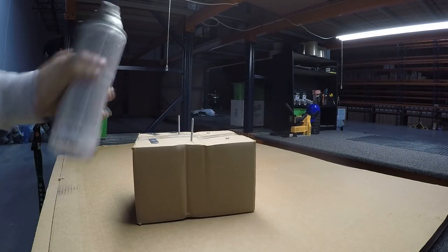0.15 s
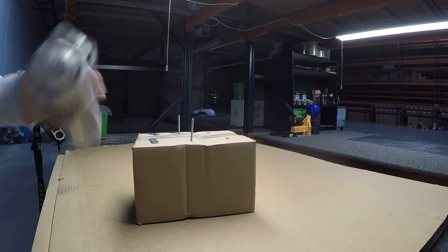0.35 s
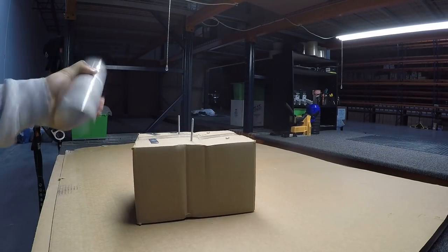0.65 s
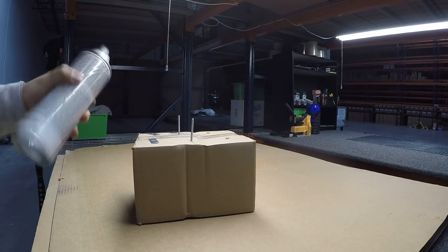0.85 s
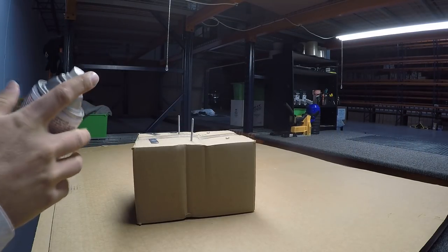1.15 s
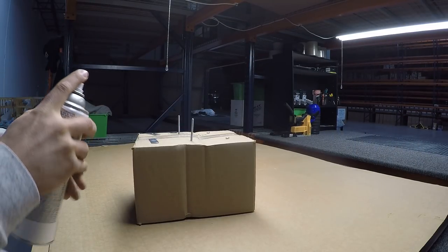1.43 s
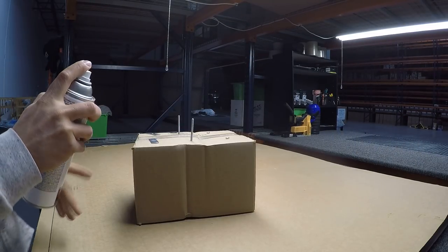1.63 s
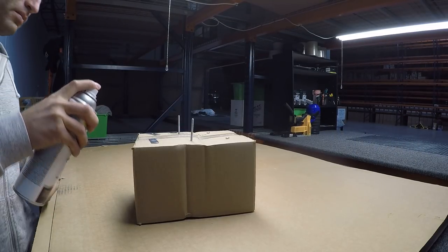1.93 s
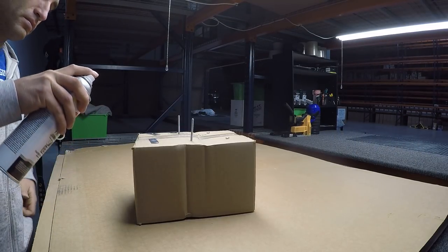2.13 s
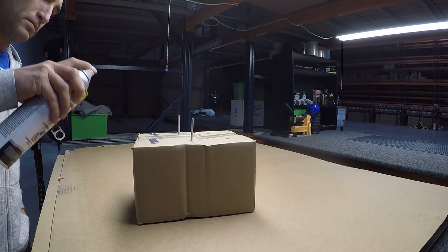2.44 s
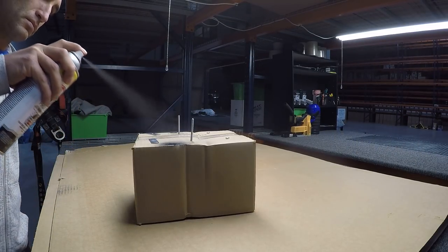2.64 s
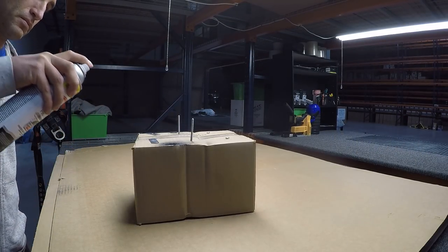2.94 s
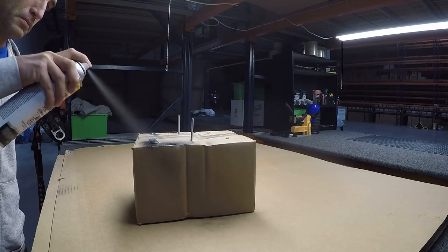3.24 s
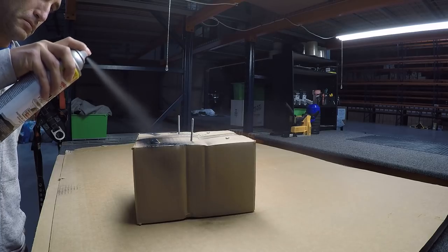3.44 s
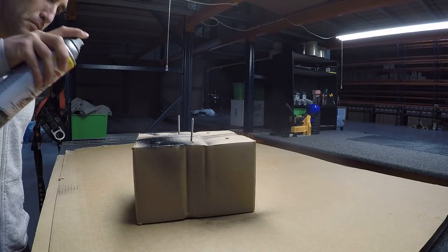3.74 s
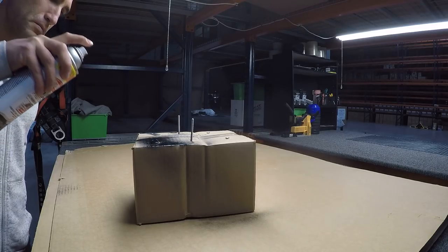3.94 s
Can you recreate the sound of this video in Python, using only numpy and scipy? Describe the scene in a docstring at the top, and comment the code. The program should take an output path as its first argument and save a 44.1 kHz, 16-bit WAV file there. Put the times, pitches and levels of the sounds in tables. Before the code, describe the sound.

A spray paint can is shaken with its ball rattling, then gives a short puff and a longer hiss in a workshop.

```python
"""A spray paint can is shaken over a bench in a large workshop, above a low ventilation rumble.
For the first second its mixing ball slams into the domed ends, skids on the wall and scrapes through paint.
From 1.4 s the can is turned in the hand; the ball rolls and taps the thin steel wall.
The nozzle puffs at 2.6 s and hisses from 3.2 to 3.7 s, the jet bouncing off cardboard.
A few faint taps follow. A near-mono microphone on the bench rounds off the hardest knocks."""
import sys
import numpy as np
from scipy import signal
from scipy.fft import rfft, irfft, next_fast_len
from scipy.io import wavfile
from scipy.ndimage import uniform_filter1d, map_coordinates

SR = 44100
rng = np.random.default_rng(int(sys.argv[2]) if len(sys.argv) > 2 else 0)


def unload_wav(signal):
    """Save mono or channel-first audio to the path in sys.argv[1] as 16-bit WAV at rate SR, clipped to [-1, 1]."""
    wavfile.write(
        sys.argv[1],
        SR,
        np.round(np.clip(np.atleast_2d(signal).T, -1, 1) * 32767).astype(np.int16),
    )


N = 179833
TIME_S = np.arange(N) / SR
RING_S = np.arange(4096) / SR  # time axis of one blow
SAMPLES_PER_MS = SR / 1000

# ventilation: freq_hz, density_db
VENT_SPECTRUM = [(20, 6.5), (45, 4), (70, -6.5), (120, -8), (170, -15), (230, -16.5), (300, -23.5),
                 (500, -28), (900, -34), (2000, -40.5), (5000, -44), (10000, -52.5), (15000, -53.5)]
# ventilation: time_s, level_db
VENT_LEVEL = [(0, -33), (.16, -39.5), (.7, -42.5), (1.3, -37.5), (1.55, -35.5), (2.18, -31), (2.28, -34.5),
              (3.2, -33), (4.08, -35.5)]
# sleeve and hand on the can: peak_s, swish_db, rub_db, t60_s (rise and fall, sign ignored)
HAND_SLIDES = [(1.4, -57, -56, 10), (1.96, -41, -70.5, 0.28), (2.1, -36.5, -50.5, 0.36),
               (2.17, -40.5, -33.5, -0.14)]
# can against the hand: start_s, level_db, t60_s
HAND_JOLTS = [(.0835, -50, .05), (0.4066, -28, 0.045), (0.5073, -24.5, 0.036), (1.095, -27, .05),
              (1.391, -27, 0.043), (1.404, -23.5, 0.042)]
# nozzle presses: open_s, close_s, hiss_db, spurt_db, wet_db
PRESSES = [(2.586, 2.726, -19.5, 1.5, -39), (3.189, 3.7, -21, 4.5, -50)]
# wet paint spat from the nozzle: peak_s, level_db
SPITS = [(2.691, -30.5), (2.721, -43), (3.201, -33.5), (3.714, -40.5)]
# gas jet: freq_hz, density_db
JET_SPECTRUM = [(400, -25), (1000, -27.5), (1900, -19.5), (2400, -19), (2950, -17.5), (3600, -17.5),
                (4200, -13.5), (5200, -9.5), (6500, -2.5), (8300, 1), (10500, 1.5), (12000, -0.5),
                (13500, -3), (15200, -8)]
# hiss off the cardboard as the hand sways: time_s, lag_ms
BOUNCE_LAG = [(2.6, 0.9), (2.66, 0.84), (2.75, 0.78), (3.2, 0.81), (3.27, 0.89), (3.33, 0.81), (3.39, 0.82),
              (3.46, 0.81), (3.53, 0.876), (3.6, 0.88), (3.66, 0.8), (3.73, 0.88)]
# ball rushing through paint: peak_s, level_db
RUSHES = [(0, -27.5), (.1, -29), (.21, -47), (.3, -25), (0.438, -29), (0.522, -24), (.595, -32),
          (0.689, -28.5), (.76, -27.5), (.82, -31), (.975, -32)]
# ball scraping through paint: freq_hz, density_db
SCRAPE_SPECTRUM = [(150, -20.5), (400, -14), (800, -28), (1400, -3), (2200, 0), (3100, 3.5), (4200, -5),
                   (6000, -5), (9000, -11.5), (12000, -16.5), (15000, -20.5)]
# ball on steel: freq_hz, density_db
CLACK_SPECTRUM = [(150, -25), (400, -16), (800, -16.5), (1400, -3.5), (2200, 0.5), (4000, 5), (6000, -2),
                  (9000, -7), (12000, -10), (15000, -20.5)]
# paint lowers the shell ring as the can tips: time_s, pitch_ratio
SHELL_TUNING = [(.8, 0.99), (.9, 0.68), (1.1, .74), (1.45, 0.97)]
# end dome, damped by paint: pitch_hz, t60_s, level_db
DOME_MODES = [(3180, 0.003, 7), (3200, .01, -7), (3820, .004, -14), (4570, 0.0054, -8),
              (5150, 0.0039, -34.5), (9400, .004, -35.5)]
# steel wall; main modes have weak twins that ring on: pitch_hz, t60_s, level_db
WALL_MODES = [(2064, 0.0055, -13), (4524, 0.011, -0.5), (4610, 0.09, -13.5), (7870, 0.0068, 3),
              (9204, 0.016, 1), (8050, 0.095, -15), (9700, 0.1, -9), (6300, .012, -27),
              (10530, 0.026, -12.5), (12000, 0.02, -11.5), (12940, 0.013, -33.5), (13440, 0.0152, -14)]
# grip shifts and damps the middle wall mode: time_s, pitch_hz, gain_db
GRIP_TUNING = [(1.6, 7790, -2), (1.95, 7850, 2), (2.05, 7900, -11), (2.6, 8050, -2), (2.85, 8100, -5.5)]
# ball taps on the wall: start_s, ring_db, low_modes_gain_db, clack_db
WALL_TAPS = [(1.4045, -16.5, -10, -28), (1.556, -14.5, -5, -12), (1.6053, -15, -1, -20),
             (1.661, -21, -0.5, -22), (1.7044, -18.5, -5.5, -18), (1.7842, -21.5, 10.5, -17.5),
             (1.85, -26.5, 10, -24.5), (1.8988, -22, -1, -23.5), (1.932, -23, -1, -23),
             (1.9664, -26.5, 5, -31), (2.006, -15.5, 6, -19), (2.092, -19, 3.5, -22),
             (2.1247, -23, -1, -24), (2.1506, -32.5, 3, -28), (2.4293, -9.5, -4.5, -14.5),
             (2.569, -12, -3.5, -18), (2.669, -14, -13, -23), (2.7907, -17, -3, -22.5),
             (2.8551, -18, -4.5, -23), (2.9093, -20, -0.5, -23), (2.9688, -23.5, -5, -29.5),
             (3.0217, -29.5, -3.5, -30), (3.05, -36, -12, -27.5), (3.827, -45.5, 3, -48.5),
             (3.9932, -47, 4, -40), (4.0051, -43.5, 5, -33.5)]
# glancing hits: start_s, contact_db, tilt_db_per_octave, shell_db, skid_t60_s
GLANCING_KNOCKS = [(0.0459, -19.5, 6.5, -17, 0.023), (0.0759, -10, 2, -34, 0.015),
                   (0.0779, -3, -.5, -28, 0.052), (0.0841, -15, 7, -31, 0.054), (.1136, -16, 1, -32, 0.018),
                   (.129, -11.5, -1, -25, 0.0051), (0.1403, -13.5, 1.5, -37, 0.0054),
                   (0.1453, -13, 6, -37, 0.0015), (0.1997, -7.5, 1, -33, 0.025),
                   (0.207, -14, 1.5, -22, 0.012), (0.2116, -10, 5, -25, 0.033),
                   (0.228, -18, 6, -28, 0.0043), (0.2579, -10, 2, -29, 0.0041),
                   (0.2687, -7.5, -0.5, -36, 0.016), (0.2862, -13.5, -5.5, -27, 0.0094),
                   (0.3285, -13, 1, -34, 0.0085), (0.3641, -11.5, 1, -38, 0.0046),
                   (.375, -14.5, 3, -43, 0.001), (0.3883, -12, 2.5, -44, .003), (.432, -22, 8, -33, 0.033),
                   (0.4507, -12.5, 0, -37, 0.013), (.4642, -17.5, 19, -30, .006),
                   (0.4952, -7, 5.5, -44, 0.002), (0.5075, -5.5, 7.5, -30, 0.0013),
                   (0.533, -9, -0.5, -32, 0.025), (0.5805, -21.5, 4, -35, 0.019),
                   (0.6892, -14, 2, -37, 0.021), (0.7045, -19.5, -2, -40, 0.0082),
                   (.726, -14.5, 0.5, -27, 0.015), (0.739, -19, .5, -33, 0.022),
                   (0.7481, -10.5, -6, -41, 0.043), (0.7944, -14.5, 1, -23, 0.024),
                   (.812, -18, 0.5, -24, 0.017), (0.8238, -23, 3, -29, .015),
                   (0.8522, -19.5, 0, -30, 0.0051), (0.874, -18, 4, -27, .004),
                   (0.8929, -23, 0, -20, 0.0091), (0.9007, -23, 9, -26, 0.01),
                   (0.956, -9.5, -1, -36, 0.009), (0.9664, -12.5, -2.5, -51, 0.0082),
                   (0.972, -16.5, 0.5, -42, 0.023), (1.0044, -21.5, -.5, -49, 0.0087),
                   (1.0945, -17.5, 13, -21.5, 0.018), (1.3893, -19.5, 8, -23, 0.037),
                   (1.4045, -8.5, -1, -25, 0.0054), (1.417, -23, 4, -34, 0.033),
                   (1.4636, -23, 6.5, -28, 0.04), (1.6888, -17.5, 0.5, -27, 0.036),
                   (2.0057, -17.5, 2, -18.5, 0.019), (2.424, -13.5, 7.5, -14, 0.017),
                   (2.534, -21, 3, -26.5, 0.012), (2.5922, -20.5, -3, -40, 0.038),
                   (2.7698, -21.5, .5, -32, 0.037), (2.83, -23.5, 8, -27.5, 0.017),
                   (2.879, -28, -2, -47, 0.0074), (2.95, -29.5, -0.5, -35, 0.038),
                   (2.979, -29, -2, -44, .02), (3.0112, -34, 0, -33, 0.014)]
# square hits on a dome: start_s, level_db, pitch_hz, first_flight_s, rebound_loss_db
DOME_SLAMS = [(.0836, -3, 3450, .0028, 9), (.1693, -0.5, 3220, .015, 11), (.2643, -6, 3220, .0223, 4.5),
              (.4053, -1.5, 3200, .0135, 8), (.5336, -7.5, 3100, .003, 4), (.6121, -6.5, 3200, .0161, 5),
              (.8742, -2, 3180, .0179, 14), (.9247, -13, 3000, .0103, 4), (1.0559, -16.5, 3000, .004, 14)]


def undb(db):
    """Decibels to gain."""
    return 10 ** (np.asarray(db) / 20)


def fade(time_s, t60_s):
    """Exponential decay."""
    return np.exp(-np.log(1000) * time_s / max(t60_s, 1e-4))


def swell(peak_s, rise_s, fall_s):
    """Gain peaking at 1; rise and fall each span 60 dB."""
    return fade(np.maximum((peak_s - TIME_S) / rise_s, (TIME_S - peak_s) / fall_s).clip(0, 2), 1)


def unit(x):
    """Scale to unit energy."""
    return x / np.sqrt(np.sum(x ** 2))


def colour(x, spectrum, tilt_db=0):
    """Minimum-phase filter through (freq_hz, gain_db) points; tilt per octave, 2 to 8 kHz."""
    size = 2 * next_fast_len(len(x))
    octave = np.log2(np.arange(size // 2 + 1) * SR / size + 1)
    hz, db = np.transpose(spectrum)
    db = np.interp(octave, np.log2(hz), db) + tilt_db * np.clip(octave - np.log2(2000), 0, 2)
    cepstrum = irfft(np.log(undb(db)))
    cepstrum[1:size // 2] *= 2
    cepstrum[size // 2 + 1:] = 0
    return irfft(rfft(x, size) * np.exp(rfft(cepstrum)))[:len(x)]


def waver(rate_hz, depth_db):
    """Randomly wandering gain."""
    knots = rng.standard_normal(int(N / SR * rate_hz) + 2)
    return undb(depth_db * np.interp(TIME_S * rate_hz, np.arange(len(knots)), knots))


def noise(spectrum, grain_db=0):
    """Coloured noise, rms 1; uneven sample sizes make it grainy."""
    x = rng.standard_normal(N) * undb(grain_db * np.minimum(rng.exponential(size=N), 6))
    return unit(colour(x, spectrum)) * np.sqrt(N)


def burst(t60_s, time_s=RING_S):
    """Decaying white noise."""
    return rng.standard_normal(len(time_s)) * fade(time_s, t60_s)


def mode(hz, t60_s, scatter, rise_s):
    """One resonance; moving paint detunes it from blow to blow."""
    hz = hz * (1 + scatter * rng.standard_normal())
    return unit(np.sin(2 * np.pi * hz * RING_S) * fade(RING_S, t60_s) * (1 - fade(RING_S, rise_s)))


def add(track, start_s, blow):
    """Mix in a blow; unit energy equals rms 1 over 1 ms."""
    i = max(int(start_s * SR), 0)
    track[i:i + len(blow)] += blow[:N - i] * np.sqrt(SAMPLES_PER_MS)


def ventilation():
    """Low rumble, drifting in level."""
    level_db = np.interp(TIME_S, *np.transpose(VENT_LEVEL))
    return undb(level_db) * noise([(4.1, -33.5)] + VENT_SPECTRUM)


def workshop(x):
    """Direct sound, scatter off bench, box and body, then a hall tail whose treble the air absorbs."""
    time_s = np.arange(SR) / SR
    near = burst(0.043, time_s) * (time_s > .002)
    near = unit(colour(near, [(300, -6), (8000, -3), (15000, 2)]))
    dull = burst(0.83, time_s) * (1 - fade(time_s, 0.02))
    dull = unit(colour(dull, [(200, 15.5), (3000, -2), (6000, -3), (10000, -8.5), (15000, -20.5)]))
    bright = burst(0.23, time_s) * (time_s > .012)
    bright = unit(colour(bright, [(300, -8), (9000, -4.5), (15000, -6.5)]))
    response = undb(-6.5) * near + undb(-19.5) * dull + undb(-21) * bright
    return x + signal.fftconvolve(x, response)[:N]


def handling():
    """Cloth and skin slide unevenly as the grip changes."""
    swish = noise([(300, -25.5), (1500, -6.5), (3500, -1.5), (6500, -6.5), (10000, -6), (15000, -16)],
                  grain_db=5)
    rub = noise([(60, 9.5), (200, -6), (750, -7), (1500, -15), (5000, -55.5)])
    slides = sum(swell(peak_s, t60_s, t60_s) * (undb(swish_db) * swish + undb(rub_db) * rub)
                 for peak_s, swish_db, rub_db, t60_s in HAND_SLIDES)
    return undb(-1.5) * slides * waver(rate_hz=70, depth_db=2.8)


def jolts():
    """The can jolts against the hand: short hollow thuds."""
    out = np.zeros(N)
    spectrum = [(80, 5), (200, -2), (380, -2), (600, -4), (850, -2.5), (1300, 0), (3000, -24)]
    for start_s, level_db, t60_s in HAND_JOLTS:
        add(out, start_s, undb(level_db) * unit(colour(burst(t60_s), spectrum)))
    return out


def nozzle():
    """Gas and droplet gains: the valve opens, pressure spurts, the finger squeezes, the valve shuts."""
    travel_s, spurt_s, shut_s, squeeze_db_per_s = 0.026, 0.062, 0.021, 2.5
    flow = 0
    wet = sum(undb(level_db) * swell(peak_s, rise_s=0.016, fall_s=0.12) for peak_s, level_db in SPITS)
    for open_s, close_s, hiss_db, spurt_db, wet_db in PRESSES:
        age_s = np.maximum(TIME_S - open_s, 0)
        opening = np.minimum(age_s / travel_s, 1) ** 3
        valve = opening * np.exp(-(np.maximum(TIME_S - close_s, 0) / shut_s) ** 2)
        spurt = np.exp(-(np.maximum(age_s - travel_s, 0) / spurt_s) ** 2)
        flow += valve * undb(hiss_db + spurt_db * spurt + squeeze_db_per_s * age_s)
        wet += valve * undb(wet_db)
    return flow, wet


def spray():
    """Turbulent jet in independently wavering bands; droplets crackle at the nozzle."""
    flow, wet = nozzle()
    jet = rfft(noise(JET_SPECTRUM, grain_db=1.1))
    hz = np.arange(len(jet)) * SR / N
    spacing_hz = 1500
    hiss = np.zeros(N)
    for centre_hz in np.arange(0, SR / 2, spacing_hz):
        band = np.maximum(1 - abs(hz - centre_hz) / spacing_hz, 0)
        hiss += irfft(jet * band, N) * waver(rate_hz=21.82, depth_db=.8)
    droplets = noise([(400, -9), (1300, -6), (2400, 6), (3000, -6), (4900, 8.5), (7000, -8.5),
                      (15000, -18.5)], grain_db=1)
    return flow * hiss * waver(rate_hz=120, depth_db=0.62) + wet * droplets


def cardboard(hiss):
    """One reflection combs the hiss; the comb glides as the nozzle moves."""
    lag_ms = np.interp(TIME_S, *np.transpose(BOUNCE_LAG))
    reflection = map_coordinates(hiss, [np.arange(N) - lag_ms * SAMPLES_PER_MS], order=5)
    return hiss + .36 * reflection


def swirl():
    """The ball scrapes through paint in grainy rushes, brighter under pressure; the slosh settles."""
    shake_end_s = 0.85
    rushes = sum(undb(level_db) * swell(peak_s, rise_s=0.1, fall_s=0.22) for peak_s, level_db in RUSHES)
    slosh = undb(-41.5) * fade(np.maximum(TIME_S - shake_end_s, 0), t60_s=2.4)
    pressure = np.hypot(rushes, slosh) * waver(rate_hz=180, depth_db=1.9)
    grit = noise([(1000, -17), (4000, 5), (8000, -2), (12000, 1), (15000, -24)], grain_db=3.5)
    scrape = noise(SCRAPE_SPECTRUM, grain_db=3.5)
    return undb(-4) * pressure * scrape + undb(14.5) * pressure ** 2 * grit


def clack(t60_s, tilt_db):
    """Ball on steel: a burst of tiny contacts, longer in a skid."""
    return unit(colour(burst(t60_s), CLACK_SPECTRUM, tilt_db))


def chatter(t60_s, grain_db):
    """Tiny bounces dying away after a blow."""
    bounces = burst(t60_s) * undb(grain_db * np.minimum(rng.exponential(size=len(RING_S)), 5))
    return unit(colour(bounces * (1 - fade(RING_S, 0.021)), CLACK_SPECTRUM, tilt_db=2))


def shell(start_s):
    """Hollow ring of the whole can, tuned by where the paint lies."""
    pitch_ratio = np.interp(start_s, *np.transpose(SHELL_TUNING))
    lower, upper = (mode(pitch_ratio * hz, t60_s=0.011, scatter=.025, rise_s=0.006)
                    for hz in (2003, 2450))
    return unit(lower + undb(-3) * upper)


def dome(pitch_ratio=1):
    """End dome ring; each landing spot favours other modes."""
    ring = 0
    for hz, t60_s, level_db in DOME_MODES:
        strike_db = rng.normal(level_db, 2)
        ring += undb(strike_db) * mode(pitch_ratio * hz, t60_s, scatter=.015, rise_s=0.0084)
    return unit(ring)


def taps():
    """The rolling ball drops against the wall; the landing spot weights the modes."""
    out = np.zeros(N)
    hollow, low, middle = 0, slice(1, 3), 3  # rows of WALL_MODES
    grip_s, grip_hz, grip_db = np.transpose(GRIP_TUNING)
    for start_s, ring_db, low_db, clack_db in WALL_TAPS:
        strike_db = ring_db - 0.5 * rng.standard_normal(len(WALL_MODES))
        strike_db[hollow] -= 7
        strike_db[low] += low_db
        strike_db[middle] += np.interp(start_s, grip_s, grip_db)
        ring = 0
        for k, (hz, t60_s, level_db) in enumerate(WALL_MODES):
            if k == middle:
                hz = np.interp(start_s, grip_s, grip_hz)
            ring += undb(level_db + strike_db[k]) * mode(hz, t60_s, scatter=0.01, rise_s=0.0026)
        contact = undb(-6) * clack(t60_s=0.014, tilt_db=-3)
        bounces = undb(-9.5) * chatter(t60_s=0.11, grain_db=-3.5)
        add(out, start_s, ring + undb(clack_db) * (contact + bounces))
    return out


def knocks():
    """Glancing hits clack and ring the shell; harder ones bring out more of the dome."""
    out = np.zeros(N)
    medium_hit_db = -16
    for start_s, contact_db, tilt_db, shell_db, skid_t60_s in GLANCING_KNOCKS:
        dome_db = -10 + 0.55 * (contact_db - medium_hit_db)
        contact = unit(clack(skid_t60_s, tilt_db) + undb(dome_db) * dome())
        add(out, start_s, undb(contact_db) * contact + undb(shell_db) * shell(start_s))
    return out


def slams():
    """Square hits ring the end dome; the ball rebounds twice, sooner and weaker each time."""
    out = np.zeros(N)
    flight_ratio = .46
    for start_s, level_db, pitch_hz, flight_s, loss_db in DOME_SLAMS:
        for rebound in range(3):
            blow = dome(pitch_hz / DOME_MODES[0][0])
            blow += undb(-14.5) * clack(t60_s=.005, tilt_db=-1.5)
            blow += undb(-19) * shell(start_s)
            add(out, start_s, undb(level_db - rebound * loss_db) * blow)
            start_s += flight_s * flight_ratio ** rebound
    return out


def scene():
    """All centred, except a trace of width in the treble of the hiss."""
    hiss = cardboard(spray())
    can = workshop(slams() + knocks() + taps() + jolts() + swirl() + handling() + hiss)
    centre = can + ventilation()
    hiss_rms = np.sqrt(np.maximum(uniform_filter1d(hiss ** 2, size=441), 0))
    side = undb(-24) * hiss_rms * noise([(3000, -50), (5500, -14), (8000, 0), (15000, -3)])
    return centre + side * np.array([[1], [-1]])


def record(dry):
    """Soft clip on the hardest knocks, then a steep low-pass."""
    ceiling, cutoff_hz = .92, 15450
    rounded = dry / (1 + (dry / ceiling) ** 6) ** (1 / 6)
    return signal.sosfilt(signal.ellip(10, .1, 80, cutoff_hz, fs=SR, output="sos"), rounded)


dry = scene()
out = record(dry)
unload_wav(out)
```